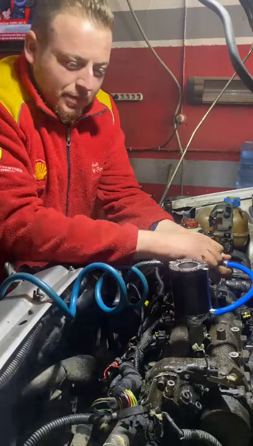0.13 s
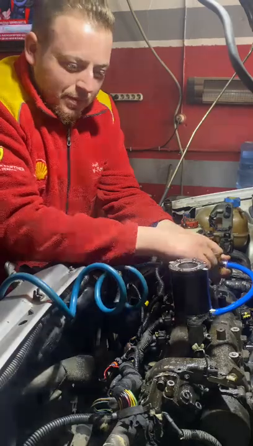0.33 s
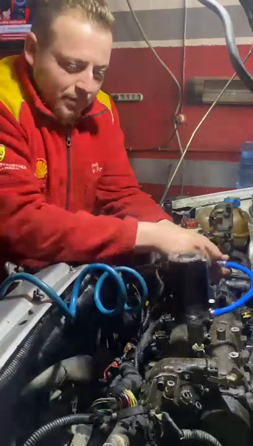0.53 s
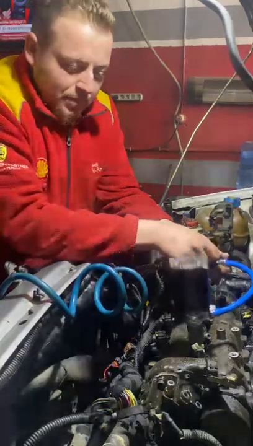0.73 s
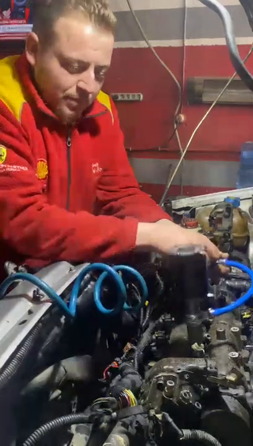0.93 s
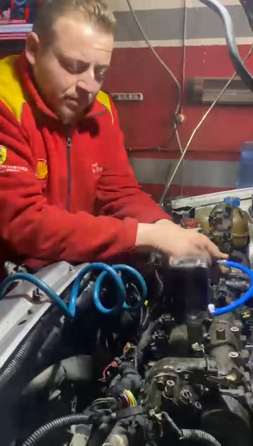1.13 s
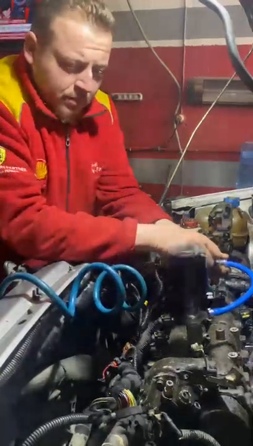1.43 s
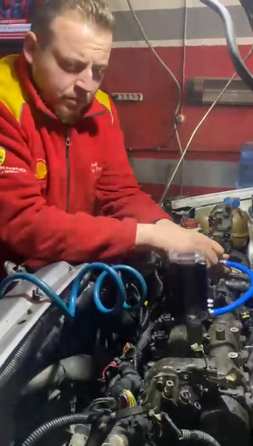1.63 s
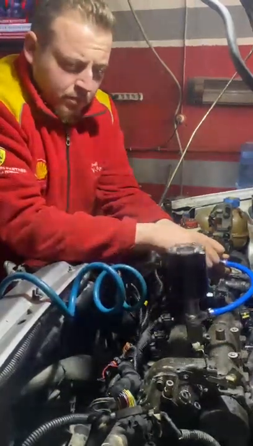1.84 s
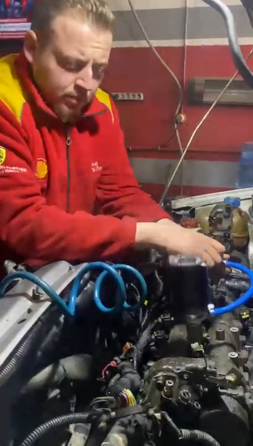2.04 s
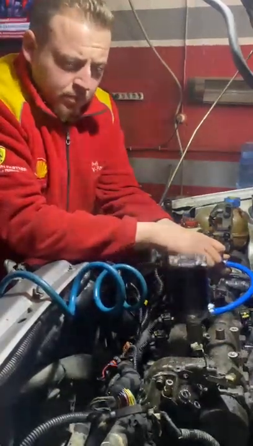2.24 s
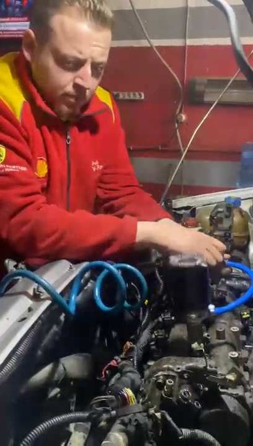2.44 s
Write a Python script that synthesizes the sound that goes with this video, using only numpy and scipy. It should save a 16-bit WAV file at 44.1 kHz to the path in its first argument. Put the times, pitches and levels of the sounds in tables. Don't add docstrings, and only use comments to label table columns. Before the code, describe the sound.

A pneumatic slide hammer on an engine, heard close by phone in a workshop. Silent until 0.08 s, then low rumble and machine hum with a soft rocking knock until about 0.3. Air leaks from 0.2, surging near 0.56. From 0.64 to the end, rapid, slightly uneven hammering, roughly thirty hits a second, alternates dull block thuds and bright steel clanks over exhaust hiss and short wall reflections; rumble drops back.

```python
import sys
import numpy as np
from scipy import signal
from scipy.fft import rfft, irfft
from scipy.io import wavfile
from scipy.ndimage import uniform_filter1d

SR = 44100
rng = np.random.default_rng(int(sys.argv[2]) if len(sys.argv) > 2 else 0)


def materialize(psi):
    bounded = np.clip(np.atleast_2d(psi).T, -1, 1)
    quanta = np.round(bounded * 32767).astype(np.int16)
    wavfile.write(sys.argv[1], SR, quanta)


def attenuation_scalar(level_db):
    decades = np.asarray(level_db, float) / 20
    return 10 ** decades


N = 114660

# frequency in Hz, level in dB per Hz.
RUMBLE_SPECTRUM = [(18, -27), (30, -5), (90, -4), (184, -11), (414, -10.5), (579, -16), (932, -21),
                   (7440, -42), (9000, -92), (11700, -113), (19800, -120)]
# frequency in Hz, level in dB, drift in dB per s.
MACHINE_HUMS = [(55, -46.5, -1), (71.4, -36.5, -3.5), (113.1, -40, 1.8)]
# start in seconds, level in dB.
KNOCK_TAPS = [
    (.094, -37),
    (0.159, -44),
    (0.263, -46),
]
# frequency in Hz, T60 in seconds, level in dB.
KNOCK_MODES = [(422, 0.073, 3.5), (330, 0.14, -11), (520, 0.089, -10)]
# time in seconds, level in dB.
LEAK_FLOW = [
    (.185, -73),
    (.22, -42.5),
    (.272, -31.5),
    (.34, -34),
    (.48, -35),
    (.56, -21.5),
    (.585, -27.5),
    (.61, -28),
    (.64, -23.5),
]
# frequency in Hz, level in dB.
HISS_SPECTRUM = [(300, -36), (1500, -21.5), (3000, -5.5), (5200, -11), (6500, -1), (8600, -0.5),
                 (10700, -2), (11900, -8.5)]
# centre in Hz, width in Hz, gain in dB.
NOZZLE_BANDS = [(2640, 234, -14), (3320, 50, 1), (3550, 98, -23), (4240, 130, 7), (5100, 110, -2),
                (5280, 75, 14), (8560, 93, 5.5), (9120, 60, -15), (10380, 110, 7.5), (10570, 180, 6),
                (11500, 140, -11), (11400, 150, 13.5)]
# time in seconds, cup ring in dB, block ring in dB re cup, edge ring in dB re cup.
DOWN_BLOWS = [(0.6821, -14, -6, -27), (0.7697, -20, -2, -19), (0.829, -20.5, -6.5, -17),
              (0.8916, -19.5, -5.5, -15), (0.9931, -16.5, -10, -18), (1.0558, -21, -5, 1),
              (1.1166, -21, -6.5, -10), (1.2314, -18, -6, -8), (1.3342, -20, -7, -24),
              (1.4234, -21.5, -7, -26), (1.4838, -22, -5, -26), (1.5448, -22, -5.5, -9),
              (1.6356, -20.5, -5.5, -36), (1.694, -21, -5, -25), (1.7568, -22, -6.5, -28),
              (1.8158, -21, -6.5, -25), (1.8764, -23.5, -6, -20), (1.9938, -20.5, -7, -3),
              (2.0548, -23.5, -2.5, 0), (2.1152, -22, -6.5, -19), (2.1774, -23, -6.5, -38),
              (2.2711, -22.5, -4.5, -6), (2.3319, -23.5, -4, -9), (2.397, -22.5, -5.5, -33),
              (2.457, -21.5, -7, -22), (2.5179, -23, -6.5, -34), (2.5751, -24.5, -1, -1)]
# time in seconds, cup ring in dB, block ring in dB re cup, edge ring in dB re cup.
UP_BLOWS = [(0.7086, -13.5, -6.5, -28), (0.7963, -13.5, -11.5, -12), (0.8579, -14, -12, -6),
            (0.9166, -14, -9.5, -10), (1.0183, -14, -13, -12), (1.0827, -13.5, -15.5, -7),
            (1.1426, -14.5, -7, -28), (1.2589, -17, -8.5, -4.5), (1.3599, -16.5, -7, -11),
            (1.4508, -15.5, -13, -23), (1.513, -19.5, -5, -24), (1.5737, -17.5, -10.5, -8),
            (1.6608, -17, -9.5, 3.5), (1.722, -15.5, -12.5, -4.5), (1.7831, -15.5, -12.5, -7),
            (1.8436, -14.5, -11.5, -25), (1.9042, -17, -9.5, -27), (2.021, -14, -15.5, -5.5),
            (2.0824, -15.5, -9.5, -2), (2.142, -15, -11, -11), (2.2039, -18, -7.5, -27),
            (2.2978, -17.5, -9, -8), (2.3607, -16, -12.5, -34), (2.4223, -17, -10, -13),
            (2.484, -17.5, -9, -17), (2.5448, -18, -9.5, -8)]
# time in seconds, cup ring in dB, block and edge rings in dB re cup.
REBOUNDS = [(0.6424, -11.5, -5.5, -35), (0.733, -12.5, -10.5, -15), (0.9532, -16, -8.5, -22),
            (1.1689, -18.5, -9, -21), (1.1905, -20, -6.5, -3), (1.295, -15, -8.5, -13),
            (1.3849, -19.5, -10.5, -25), (1.5964, -20.5, -7.5, -17), (1.929, -18, -10, -22),
            (1.955, -22.5, -9, -28), (2.2338, -20, -5, -10)]
# frequency in Hz, T60 in seconds, level down in dB, level up in dB.
BLOCK_MODES = [(156.5, 0.025, -4, -1.5), (290, 0.15, -20, -7), (366.6, 0.15, -5.5, -2.5),
               (420, 0.049, -7, -3.5), (746, 0.012, -11, 2.5), (909, 0.058, -41, -4),
               (1084.6, 0.028, 5, -1.5), (1214, 0.082, -2, 0.5), (1325, 0.056, 4.5, 0.5),
               (1575, 0.066, -14.5, -3.5), (1712, 0.021, 7, -2.5), (2279, 0.028, -1.5, -4),
               (3079, 0.015, 2, 0.5)]
# frequency in Hz, T60 in seconds, level down in dB, level up in dB.
CUP_MODES = [(4200, 0.011, 2, -8), (4963, 0.0055, 4, 7.5), (5225, 0.025, 2, -9), (6096, 0.018, -25, -6.5)]
# frequency in Hz, T60 in seconds, level down in dB, level up in dB.
EDGE_MODES = [(7200, .004, -4, -4), (8500, .010, 2, 4), (9500, .010, 1, 6), (10800, .006, 0, 0)]
# rise in seconds, fall in seconds.
CONTACT_S = [(0.002629, 0.0026), (0.001986, 0.0017)]
LEAD_S = [0.001198, .001]
# frequency in Hz, level in dB.
CRACK_SPECTRUM = [(100, -47), (300, -1), (600, 3.5), (1000, 4.5), (3000, 3.5), (5500, 4), (9000, 3),
                  (12000, -14.5)]
# frequency in Hz, level in dB.
ROOM_SPECTRUM = [(300, 3), (1000, 3.5), (5000, -3.5), (12000, -44)]
# frequency in Hz, left phase lead in radians, likeness 0-1, left minus right in dB.
PORTS = [(60, 0, 1, 0), (110, 0, .998, 0), (220, -.2, .98, -.5), (380, -.8, .88, -1.5),
         (700, -2.4, .4, -6.5), (1200, -.1, .62, -4.5), (2000, .5, .8, -1), (2800, 1.3, .5, -1.5),
         (4400, .7, .7, -3.5), (5800, .6, .7, -2.5), (6450, np.pi, .98, 0), (8200, np.pi, .98, 0),
         (8700, 4.8, .75, 0), (9600, 2 * np.pi, .97, 0), (11600, 2 * np.pi, .95, 0), (11900, 7.5, .4, 0)]
# start in seconds, length in seconds, level in dB (unused).
KEPT_STRETCHES = [(0.768, 0.052, -50), (0.842, 0.05, -44), (0.904, 0.048, -41), (0.978, 0.074, -48),
                  (1.068, 0.126, -48), (1.239, 0.048, -48), (1.281, 0.05, -47), (1.325, 0.072, -50),
                  (1.393, 0.1, -49), (1.558, 0.052, -43), (1.64, 0.106, -49), (1.812, 0.076, -44),
                  (1.884, 0.074, -50), (1.979, 0.08, -45), (2.073, 0.044, -48), (2.117, 0.05, -51),
                  (2.209, 0.05, -52), (2.283, 0.044, -47), (2.393, 0.074, -44), (2.466, 0.116, -46)]


def curve(table, x, col=1):
    table = np.array(table, float)
    return np.interp(x, table[:, 0], table[:, col])


def unit(x):
    return x / np.sqrt(np.mean(x ** 2))


def colour(x, table):
    n = x.shape[-1]
    hz = np.arange(n // 2 + 1) * SR / n + 1
    log_table = [(np.log(f), db) for f, db in table]
    return irfft(rfft(x) * attenuation_scalar(curve(log_table, np.log(hz))), n)


def mode(x, hz, t60_s):
    radius = np.exp(-np.log(1000) / (t60_s * SR))
    w = 2 * np.pi * hz / SR
    gain = np.sqrt(1 - radius ** 2) * np.sin(w)
    return signal.lfilter([gain], [1, -2 * radius * np.cos(w), radius ** 2], x)


def walk(rate_hz):
    hold = int(SR / rate_hz)
    steps = np.repeat(rng.standard_normal(N // hold + 1), hold)
    return 1.3 * uniform_filter1d(steps, hold)[:N]


def shop(t):
    level_db, deep_sag_db_s, duck_db, duck_s = -38.5, -9, -7, 0.05
    hum = 0
    for hz, db, drift_db_s in MACHINE_HUMS:
        level = attenuation_scalar(db + drift_db_s * t + 1.6 * walk(7.73))
        phase = 2 * np.pi * np.cumsum(hz * (1 + 0.0123 * walk(13.1))) / SR
        hum = hum + level * np.sin(phase)
    rumble = attenuation_scalar(level_db + walk(17.7)) * unit(colour(rng.standard_normal((2, N)), RUMBLE_SPECTRUM))
    deep = colour(rumble, [(40, 0), (60, -40)])
    rumble = rumble - deep * (1 - attenuation_scalar(deep_sag_db_s * t))
    duck = attenuation_scalar(duck_db * np.clip((t - REBOUNDS[0][0]) / duck_s, 0, 1))
    return duck * (hum + rumble)


def knock(t):
    taps = sum(attenuation_scalar(db) * (np.abs(t - start_s) < 0.0004) for start_s, db in KNOCK_TAPS)
    return sum(attenuation_scalar(db) * mode(taps, hz, t60_s) for hz, t60_s, db in KNOCK_MODES)


def air(t):
    exhaust_db, sag_db_s, air_db = -35.5, -3, 5.5
    run_s = LEAK_FLOW[-1][0]
    running_db = exhaust_db + sag_db_s * (t - run_s)
    flow_db = np.where(t < run_s, curve(LEAK_FLOW, t), running_db)
    level = attenuation_scalar(flow_db + air_db + 0.8 * walk(30))
    hz = np.arange(N // 2 + 1) * SR / N
    nozzle_db = sum(db * np.exp(-((hz - centre) / width) ** 2) for centre, width, db in NOZZLE_BANDS)
    hiss = colour(rng.standard_normal((2, N)), HISS_SPECTRUM)
    return level * unit(irfft(rfft(hiss) * attenuation_scalar(nozzle_db), N))


def room(x):
    level_db, t60_s, gap_s = -9, 0.22, 0.004
    t = np.arange(12000) / SR
    out = 0
    for _ in range(4):
        tail = rng.standard_normal((2, len(t))) * attenuation_scalar(-60 * t / t60_s) * np.clip(t / gap_s, 0, 1)
        tail = colour(tail / np.sqrt(np.sum(tail ** 2) * 2), ROOM_SPECTRUM)
        out = out + signal.oaconvolve(x * walk(20), tail, axes=1)[:, :N]
    return attenuation_scalar(level_db) * out


def rough(train, shape):
    return signal.oaconvolve(train, shape)[:N] * rng.standard_normal((2, N))


def blows(rows, kind):
    rattle_db, rattle_s, push_db, push_s = -25, 0.032, 1.5, 0.0001
    crack_db, clatter_db = (-2.5, -4)[kind], -9
    same_share, bottom_hz = 0.93, 167
    rows, t = np.array(rows), np.arange(4000) / SR
    rise_s, fall_s = CONTACT_S[kind]
    onset = np.clip(t / rise_s, 0, 1) ** 2
    scrape = onset * np.exp(-np.maximum(t - rise_s, 0) / fall_s)
    rattle = onset * np.exp(-t / rattle_s)
    push = attenuation_scalar(push_db) * np.exp(-np.abs(t - rise_s) / push_s)
    drive_gain = 2 * np.sqrt(np.sum(scrape ** 2)) / np.sum(scrape)
    starts = ((rows[:, 0] - LEAD_S[kind]) * SR).astype(int)
    out = np.zeros((2, N))
    for modes, extra_db in ((BLOCK_MODES, rows[:, 2]), (CUP_MODES, 0), (EDGE_MODES, rows[:, 3])):
        train = np.zeros(N)
        train[starts] = attenuation_scalar(rows[:, 1] + extra_db)
        contact = rough(train, np.sqrt(1 - same_share ** 2) * scrape + attenuation_scalar(rattle_db) * rattle)
        hard = push if modes is BLOCK_MODES else np.diff(push)
        contact[0] += signal.oaconvolve(train, hard)[:N]
        for hz, t60_s, *level_db in modes:
            drive = drive_gain * scrape * np.sin(2 * np.pi * (hz * t + rng.random((2, 1))))
            same = signal.oaconvolve(train[None], same_share * drive, axes=1)[:, :N]
            out += attenuation_scalar(level_db[kind]) * mode(contact + same, hz, t60_s)
        if modes is CUP_MODES:
            out += colour(rough(train, attenuation_scalar(crack_db) * scrape + attenuation_scalar(clatter_db) * rattle), CRACK_SPECTRUM)
    return signal.sosfilt(signal.butter(2, bottom_hz, "high", fs=SR, output="sos"), out)


def scene():
    t = np.arange(N) / SR
    hammer = attenuation_scalar(3) * (blows(DOWN_BLOWS, kind=0) + blows(UP_BLOWS + REBOUNDS, kind=1))
    return hammer + room(hammer) + air(t) + shop(t) + knock(t)


def ports(dry):
    ceiling = 0.66
    hz = np.arange(N // 2 + 1) * SR / N
    a, b = rfft(dry)
    like, lean_db = np.clip(curve(PORTS, hz, col=2), 0, 1), curve(PORTS, hz, col=3)
    left = (like * a + np.sqrt(1 - like ** 2) * b) * np.exp(1j * curve(PORTS, hz)) * attenuation_scalar(lean_db / 2)
    right = a * attenuation_scalar(-lean_db / 2)
    return ceiling * np.tanh(irfft(np.array([left, right]), N) / ceiling)


def starve(x):
    hz, t = np.arange(N // 2 + 1) * SR / N, np.arange(N) / SR
    centre = irfft(rfft(x.mean(axis=0)) * (hz > 6450) * (hz < 8250), N)
    side = irfft(rfft(x[0] - x[1]) / 2 * (hz > 9550), N)
    weak = centre + side * [[1], [-1]]
    trim_s = 0.009
    kept = 1.0 * (t > 0.2) * (t < 0.258)
    for start_s, length_s, _ in KEPT_STRETCHES:
        kept = kept + (t > start_s + trim_s) * (t < start_s + length_s - trim_s)
    return x - weak * (1 - uniform_filter1d(kept, size=128))


def top_cut(x):
    return signal.sosfilt(signal.butter(12, 12890, fs=SR, output="sos"), x)


def record(dry):
    start_s, fade_s, top_hz = 0.0825, 0.00058, 11800
    steep = signal.ellip(12, 0.5, 75, top_hz, fs=SR, output="sos")
    x = signal.sosfilt(steep, starve(ports(dry)))
    x = x * np.clip((np.arange(N) / SR - start_s) / fade_s, 0, 1)
    return top_cut(x)


dry = scene()
out = record(dry)
materialize(out)
```